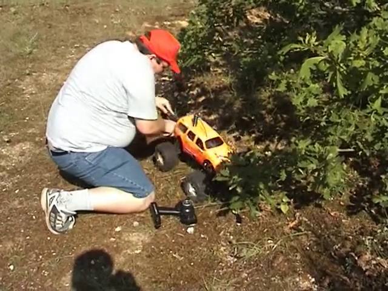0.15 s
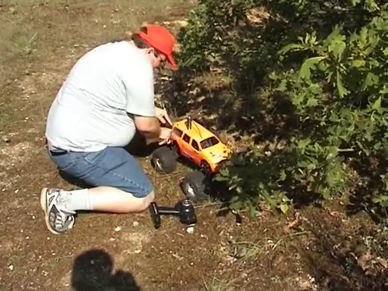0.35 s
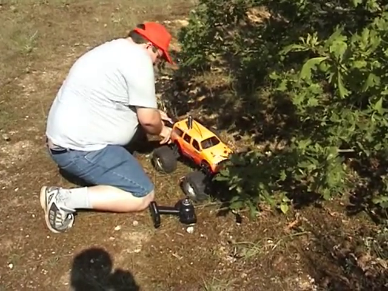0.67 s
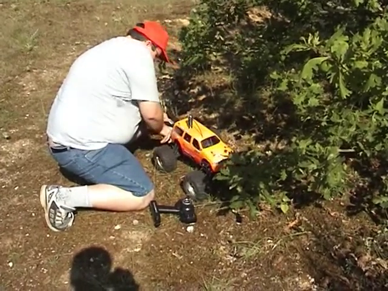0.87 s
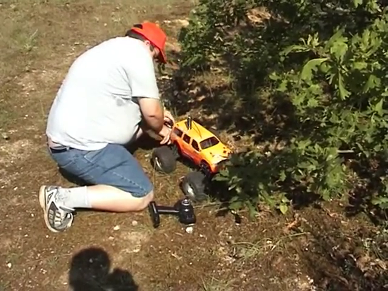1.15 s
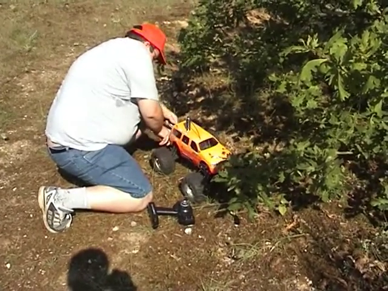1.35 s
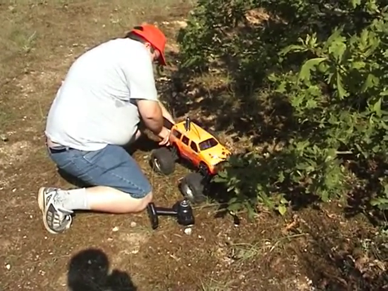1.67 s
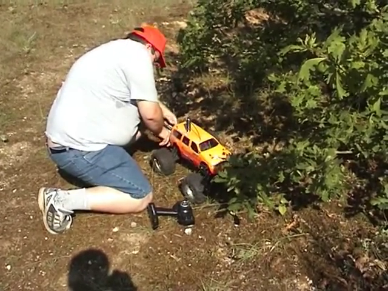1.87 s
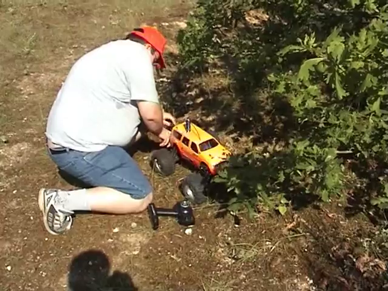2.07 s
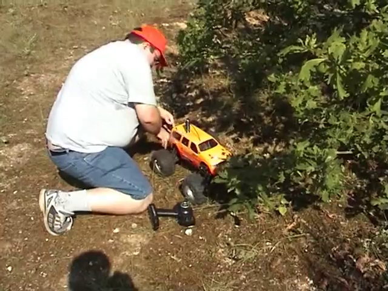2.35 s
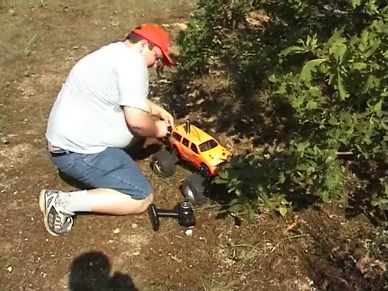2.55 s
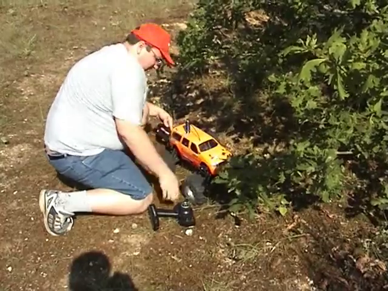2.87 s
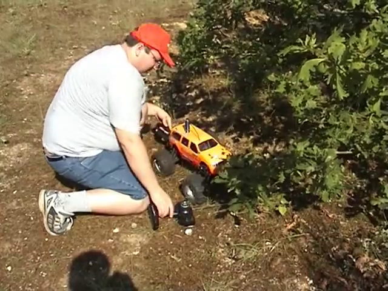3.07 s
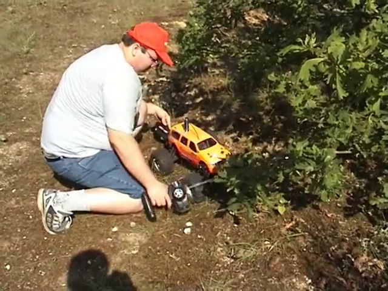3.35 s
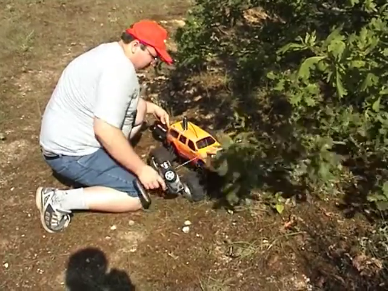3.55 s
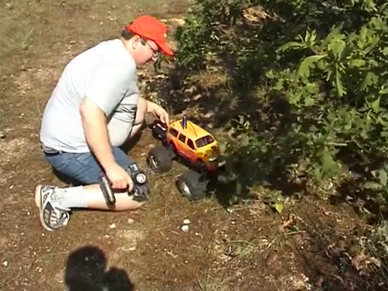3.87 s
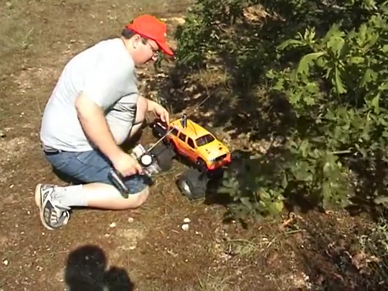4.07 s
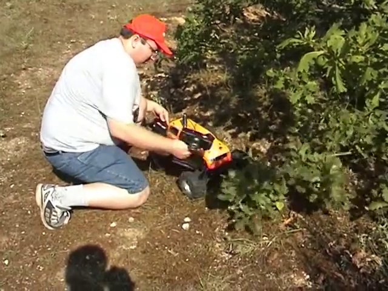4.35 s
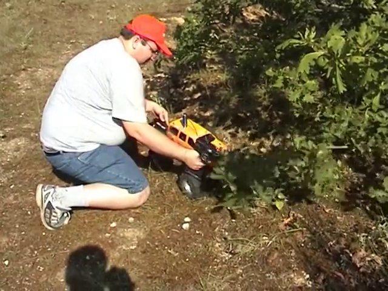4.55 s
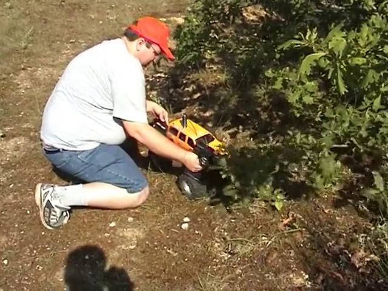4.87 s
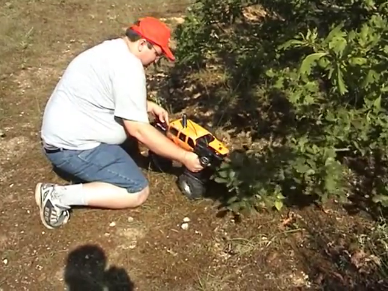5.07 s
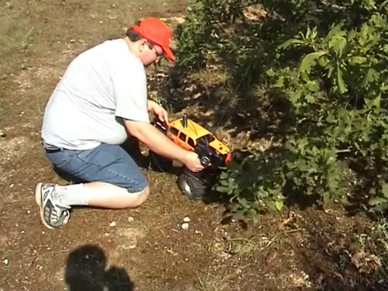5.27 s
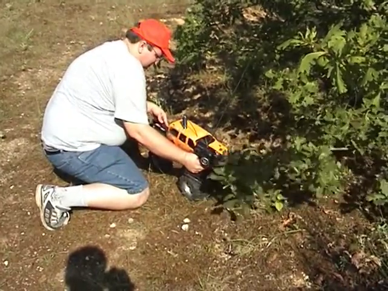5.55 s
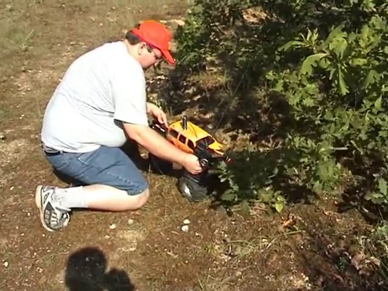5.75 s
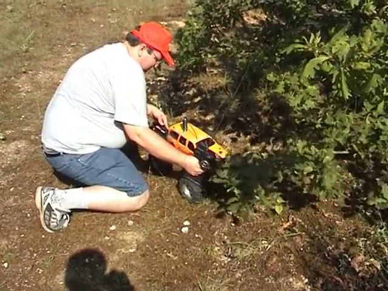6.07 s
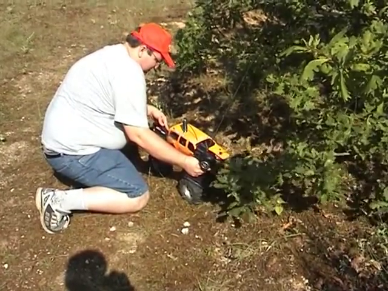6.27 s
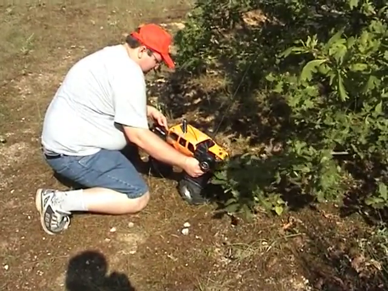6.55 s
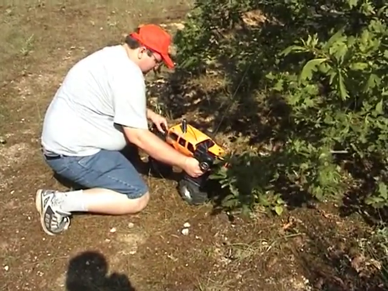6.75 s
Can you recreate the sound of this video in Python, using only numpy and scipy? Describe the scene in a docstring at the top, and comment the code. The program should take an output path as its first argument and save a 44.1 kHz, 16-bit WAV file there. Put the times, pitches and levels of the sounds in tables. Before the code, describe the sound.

Outdoors, nearly still air with faint knocks, soft tyre bumps and scuffs as a plastic model truck is handled. A sharper clatter and leaf rustle follow as the starter tool is picked up and brought to it. Two short geared whines with puffs and clacks turn the engine over, the second coughing. On the third it catches and runs very loud, buzzing and uneven until the cut. Microphone a few steps away, slight echo from foliage.

```python
"""A small two-stroke glow engine idles loudly and unevenly: each burn is a pressure pulse that excites the
resonances of a tuned pipe and of a finned cylinder, with a spurt of gas noise.
Before it catches on the third pull, a hand starter's gear whine turns it over in two bursts, with air puffs,
drive clacks and a few coughs. Earlier the model truck is handled: decaying knocks, tyre booms, scuffs and
rustling leaves, built from impulses and swelling noise. Foliage echoes and open air surround it."""
import sys
import numpy as np
from scipy import signal
from scipy.fft import rfft, irfft, next_fast_len
from scipy.io import wavfile

SR = 44100
rng = np.random.default_rng(int(sys.argv[2]) if len(sys.argv) > 2 else 0)


def to_wav(sig):
    """Store sig (one row per channel, or 1-D mono) as 16-bit WAV at the path in sys.argv[1].

    Samples outside -1..1 are clipped; the rate is SR.
    """
    pcm = np.clip(np.atleast_2d(sig), -1, 1) * 32767
    pcm = np.round(pcm).astype(np.int16)
    wavfile.write(sys.argv[1], SR, pcm.T)  # frames by channels


N = 304290
TIME = np.arange(N) / SR
CATCH_S = 6.0412

# Idle speed. Each row: time in seconds, firing rate in Hz.
IDLE_SPEED = [(6.04, 104), (6.126, 111.7), (6.266, 120), (6.338, 117), (6.388, 110.5), (6.436, 118),
              (6.516, 123.3), (6.598, 121.7), (6.642, 118), (6.696, 123.2), (6.72, 116), (6.768, 126.5),
              (6.854, 122.7), (6.9, 114.3)]
# Single firings before the engine catches. Each row: time in seconds, relative level in dB.
COUGHS = [(5.6286, 1.5), (5.6392, 0), (5.6484, -2), (5.6578, -0.5), (5.6887, -5.5), (5.701, -2.5)]
# Uneven idle: chance of a weak burn (never two running), its level, and the spread of all levels.
WEAK_CHANCE, WEAK_DB, SPREAD_DB = .27, -4.5, 1
# Delay after a weak burn and random timing spread, as shares of a turn.
STUMBLE_TURNS, JITTER_TURNS = .08, .026
# Exhaust modes under a firing. Each row: frequency in Hz, bandwidth in Hz, gain in dB, polarity.
HOT_PIPE_MODES = [(168.5, 134, 27, 1), (209, 23.5, 31, 1), (259.6, 96, 36.5, -1), (714, 204, 21.5, 1),
                  (742, 70, 24, -1), (1188.5, 159, 27, 1), (1320, 406, 29, -1), (1584, 400, 26.5, 1),
                  (2047, 33.3, 30.5, 1), (2615, 89, 11, -1), (2850, 49, 13, -1)]
# The low boom follows only this share of a burn's strength in dB.
BOOM_FOLLOWS = 0.68
# Modes of the cylinder and cooling fins. Each row: frequency in Hz, bandwidth in Hz, relative gain in dB.
FIN_MODES = [(3630, 58, -1.5), (4040, 120, -5.5), (5110, 49, 7.5), (5150, 73, -24), (5850, 136, -1.5),
             (6300, 45, -5), (7300, 51, -11), (7550, 57, 0), (9200, 180, -20), (11500, 51, -5)]
# The fins start at this relative level and ring up after the catch.
FINS_START_DB, SETTLE_S = -4, 0.24
# Spectrum of the escaping gas. Each row: frequency in Hz, relative level in dB.
EXHAUST_HISS = [(2000, -10), (2600, 16.5), (3300, -3.5), (7500, -4.5), (10500, -6), (12500, -28),
                (14000, -39)]

# Unfired strokes puffing through the pipe. Each row: time in seconds, relative level in dB.
PUFFS = [(5.084, -27.5), (5.109, -1), (5.1601, -0.5), (5.2076, -1), (5.2539, 0), (5.531, -0.5),
         (5.587, -0.5), (5.6871, -0.5), (5.727, -18.5), (5.742, -16.5)]
# Exhaust modes under cold air. Each row: frequency in Hz, bandwidth in Hz, relative gain in dB, polarity.
COLD_PIPE_MODES = [(179, 96, 30, 1), (226.6, 10.4, 44, -1), (314, 83, 36, -1), (378.4, 27.5, 34, -1),
                   (729, 26, 33.5, 1), (1560, 500, 29, -1)]

# Pulls on the starter's trigger. Each row: on in seconds, off in seconds, coasting time in seconds, level in dB.
TRIGGER = [(5.022, 5.228, .125, -24.5), (5.491, 5.632, .13, -26), (5.992, 6.223, 0.16, -25)]
# Gear mesh at free speed, spin-up time constant, and exponent of loudness against speed.
FREE_MESH_HZ, SPIN_UP_S, LOUDNESS_POWER = 2520, .035, 1.32
# Compression slows it just before each puff: share of speed lost, lead, Gaussian width.
SAG_SHARE, SAG_LEAD_S, SAG_WIDTH_S = .08, 0.00504, .011
# Once the engine runs the gears are unloaded: change of their whine, and the time it takes.
UNLOADED_DB, UNLOAD_S = -9.5, 0.066
# Starter partials. Each row: multiple of the gear mesh frequency, relative level in dB.
WHINE_PARTIALS = [(1, 0), (4 / 3, -17.5), (5 / 3, -14), (2, -10), (8 / 3, -13.5), (3, -7.5), (4, -4),
                  (3.9, -21)]
# Gear noise spectrum. Each row: frequency in Hz, relative level in dB.
GEAR_NOISE = [(300, 0), (550, -1.5), (780, -1.5), (1050, -11.5), (1600, 0.5), (2500, -2.5), (3300, -5),
              (5400, -13.5), (6800, -7), (8300, -9.5), (9800, -5.5), (11700, -9), (14000, -32)]
# Spectrum of the churned air. Each row: frequency in Hz, relative level in dB.
CHURN_COLOUR = [(110, -11), (230, 12), (380, -9), (550, -18), (900, -4)]
# The drive clacks as it pushes the piston over compression. Each row: time in seconds, relative level in dB.
CLACKS = [(5.031, -30.5), (5.133, -19.5), (5.182, -19.5), (5.228, -16.5), (5.24, -27.5), (5.282, -22.5),
          (5.307, -27.5), (5.503, -34), (5.559, -19), (5.6074, -14.5), (5.6693, -10.5), (5.675, -20),
          (5.7099, -14), (5.7432, -27.5), (6.004, -33)]
# Clack spectrum. Each row: frequency in Hz, relative level in dB.
CLACK_COLOUR = [(530, -3), (900, -6.5), (1490, -6), (2010, -13), (2560, 0.5), (3040, -9.5), (3650, -8),
                (5780, -24.5), (7280, -15.5), (10500, -15), (14000, -32.5)]
CLACK_T60_S, CLACK_ATTACK_S = .031, 0.0013
# Metal that rings on after a clack. Each row: frequency in Hz, bandwidth in Hz, gain in dB.
CLACK_RINGS = [(2950, 22, 22), (7680, 4, 16)]

# Knocks on the plastic truck and its gear.
# Each row: time in seconds, relative level in dB, ring frequency in Hz, hardness of the contact in dB.
KNOCKS = [(0.234, -54, 1300, -11), (0.295, -63, 1280, 12), (0.334, -43.5, 910, -13), (1.33, -45, 875, -17),
          (1.585, -50, 960, -19), (1.789, -51.5, 1310, -5), (1.906, -51, 1170, -4),
          (1.924, -35.5, 1390, -1), (3.038, -36.5, 1240, 5), (3.373, -50, 1930, 5),
          (3.443, -23.5, 1576, 2.5), (3.494, -35, 1610, 2.5), (3.584, -44.5, 1660, -3),
          (3.645, -45, 921, -2), (4.134, -62.5, 912, 21.5), (4.576, -34, 1520, -1.5),
          (4.597, -42, 1040, -3), (4.612, -43.5, 1480, -11), (4.632, -44.5, 1540, -7)]
# Spectra of a knock's thump, shell and tick. Each row: frequency in Hz, relative level in dB.
THUMP_COLOUR = [(170, -23), (300, 11), (450, -8), (750, 2), (1200, -22)]
SHELL_COLOUR = [(450, -18), (900, -5), (1400, 1), (2400, -1.5), (4000, -11), (7000, -34)]
TICK_COLOUR = [(2000, -10), (4000, -1), (10000, -3.5), (13000, -19)]
# The truck drops on its tyres. Each row: time in seconds, relative level in dB.
BOUNCES = [(0.235, -48.5), (0.335, -47), (1.923, -38.5), (4.612, -44.5)]
TYRE_HZ, TYRE_WIDTH_HZ = 200, 17

# The bush is brushed and springs back.
# Each row: peak in seconds, relative level in dB, rise constant in seconds, fall constant in seconds.
BRUSHES = [(3.455, -44, 0.01, 0.08), (3.75, -51, .1, 0.095), (4.4, -56, 0.25, 0.075),
           (4.61, -54, 0.042, .12)]
# Hands and gear scuff over the shell.
# Each row: peak in seconds, relative level in dB, rise constant in seconds, fall constant in seconds.
SCUFFS = [(0.17, -60.5, .06, .04), (0.32, -59, 0.033, 0.037), (1.265, -66, .02, .02),
          (2.48, -52.5, 0.023, .022), (3.33, -60, .08, 0.099), (3.735, -54.5, 0.018, 0.031)]
# Spectrum of the rubbing noise. Each row: frequency in Hz, relative level in dB.
LEAF_COLOUR = [(400, 2.5), (1000, -7), (1700, -1), (3000, -0.5), (5000, -4.5), (9000, -4), (11000, -10.5),
               (13500, -24)]
# Modes of the plastic body shell. Each row: frequency in Hz, bandwidth in Hz, relative gain in dB.
SHELL_MODES = [(833, 110, 1), (1250, 130, 1.5), (1550, 160, 3), (1940, 160, -4.5), (2740, 210, -6),
               (4100, 280, -9)]

# Left minus right for sound from the truck. Each row: frequency in Hz, level difference in dB.
TRUCK_PAN = [(200, 0.83), (650, -0.8), (1250, 5.5), (2200, 2), (4000, -1), (7400, -3.5), (13000, 2)]
# Spectrum of the background air. Each row: frequency in Hz, relative level in dB.
AIR_COLOUR = [(15, -44), (25, -15.5), (60, -6), (182, -10), (286, -6.5), (335, -9), (584, -9.5),
              (741, -13.5), (824, -12.5), (1440, -20.5), (2860, -20.5), (3350, -24), (9920, -28.5),
              (12300, -40), (14000, -70)]
# Stereo width of the air. Each row: frequency in Hz, side minus mid in dB.
AIR_WIDTH = [(60, -7), (110, -0.5), (200, 0), (370, -1.5), (670, 3.5), (1220, 4.5), (2230, 2), (4070, 1.5),
             (7440, -3), (13600, -4)]
CUTOFF_HZ = 14100


def engine(pipe_db, fins_db, blow_noise, hiss_db, rumble_db, turbulence_db):
    """Pulse excitation: each firing rings the pipe, strikes the finned cylinder and lets out a spurt of gas."""
    pulses = firings(count=200) + clicks(*np.transpose(COUGHS))
    spurt = fade(pulses, t60=.075, attack_s=.0006)
    # turbulence behind each pulse roughens the upper modes of the pipe
    turbulence = from_db(turbulence_db) * spurt * rng.standard_normal(N)
    boom = pipe(pulses ** BOOM_FOLLOWS, HOT_PIPE_MODES[:3])
    exhaust = boom + pipe(pulses + turbulence, HOT_PIPE_MODES[3:])

    blow_tail = fade(pulses, t60=0.016, attack_s=0.00028)
    blows = pulses + blow_noise * blow_tail * rng.standard_normal((2, N))
    fins = sum(from_db(db) * resonate(blows, hz, width) for hz, width, db in FIN_MODES)
    fins *= from_db(FINS_START_DB * np.clip(1 - (TIME - CATCH_S) / SETTLE_S, 0, 1))

    hiss = noise(EXHAUST_HISS, side_db=-10)
    rumble = noise([(20, -7), (70, -5.0), (300, 0), (900, -5), (1500, -25)], side_db=-9.5)
    gas = from_db(hiss_db) * hiss + from_db(rumble_db) * rumble
    return from_db(pipe_db) * exhaust + from_db(fins_db) * fins + spurt * gas


def firings(count):
    """Combustion irregularity: now and then a turn burns weakly, and the next firing comes late."""
    times, levels, s, was_weak = [], [], CATCH_S, False
    for chance, size, timing in zip(rng.random(count), *rng.standard_normal((2, count))):
        turn_s = 1 / np.interp(s, *np.transpose(IDLE_SPEED))
        weak = chance < WEAK_CHANCE and not was_weak and len(times) > 1
        # the weak burn itself comes early by half the stumble
        shift_turns = STUMBLE_TURNS * (was_weak - weak / 2) + JITTER_TURNS * timing
        times.append(s + shift_turns * turn_s)
        levels.append(weak * WEAK_DB + SPREAD_DB * size)
        # the flywheel holds the mean speed through weak burns
        s += turn_s
        was_weak = weak
    sounding = np.array(times) < N / SR
    return clicks(np.array(times)[sounding], np.array(levels)[sounding])


def pipe(x, modes):
    """Modal superposition: pressure pulses ring the modes of the exhaust, each with its polarity."""
    return sum(np.sign(polarity) * from_db(db) * resonate(x, hz, width)
               for hz, width, db, polarity in modes)


def puffs(puff_db, soft_hz, gulp_db, gulp_s):
    """Soft excitation: the port opens on a push of air, a weaker gulp follows and the pipe rings on."""
    s, db = np.transpose(PUFFS)
    strokes = clicks(s, db) - clicks(s + gulp_s, db + gulp_db)
    soften = signal.butter(2, soft_hz, fs=SR, output="sos")
    return from_db(puff_db) * pipe(signal.sosfilt(soften, strokes), COLD_PIPE_MODES)


def starter(whine_db, gears_db, clack_db, churn_db, wobble, flutter_db):
    """Gear-mesh radiation: pitch and level follow motor speed; the drive clacks and the piston churns air."""
    pulls = [(motor_speed(on_s, off_s, coast_s), db) for on_s, off_s, coast_s, db in TRIGGER]
    speed = sum(share for share, db in pulls)
    level = sum(from_db(db) * share ** LOUDNESS_POWER for share, db in pulls)

    mesh_hz = FREE_MESH_HZ * speed * (1 + wobble * (drift(700) + drift(110)))
    phase = 2 * np.pi * np.cumsum(mesh_hz) / SR
    partials = sum(from_db(db + flutter_db * drift(160)) * np.sin(multiple * phase)
                   for multiple, db in WHINE_PARTIALS)
    whine = speed ** 3 * rms_one(partials)
    whine *= from_db(UNLOADED_DB * np.clip((TIME - CATCH_S) / UNLOAD_S, 0, 1))
    # the teeth scrape harder once per motor turn
    gears = noise(GEAR_NOISE, side_db=-7) * (1 + .6 * np.sin(phase / 9))
    churn = speed ** 3 * noise(CHURN_COLOUR, side_db=-25)
    running = from_db(whine_db) * whine + from_db(gears_db) * gears + from_db(churn_db) * churn

    hits = clicks(*np.transpose(CLACKS))
    clacks = fade(hits, CLACK_T60_S, CLACK_ATTACK_S) * noise(CLACK_COLOUR, side_db=-16.5)
    rings = sum(from_db(db) * resonate(hits, hz, width) for hz, width, db in CLACK_RINGS)
    return level * running + from_db(clack_db) * clacks + rings


def motor_speed(on_s, off_s, coast_s):
    """Rotor inertia and load: share of free speed through spin-up, compression sags and coasting to rest."""
    spin_up = 1 - np.exp(-np.maximum(TIME - on_s, 0) / SPIN_UP_S)
    coast = np.clip(1 - (TIME - off_s) / coast_s, 0, 1)
    load = sum(from_db(db) * np.exp(-np.minimum(((TIME - s + SAG_LEAD_S) / SAG_WIDTH_S) ** 2, 20))
               for s, db in PUFFS if on_s < s < off_s + coast_s)
    return spin_up * coast * np.clip(1 - SAG_SHARE * load, 0, 1)


def knocks(thump_db, body_db, tick_db, ring_db, ring_width_hz, softening):
    """Impact of solids: thump, shell ring and tick; a harder contact ticks more and thumps less."""
    s, db, ring_hz, hardness = np.transpose(KNOCKS)
    thumps = clicks(s, db + thump_db - softening * hardness)
    bodies = clicks(s, db + body_db)
    ticks = clicks(s, db + tick_db + hardness)
    out = fade(thumps, t60=.04, attack_s=.001) * noise(THUMP_COLOUR, side_db=-14)
    out += fade(bodies, t60=.03, attack_s=.0007) * noise(SHELL_COLOUR, side_db=-12)
    out += fade(ticks, t60=0.019, attack_s=.0004) * noise(TICK_COLOUR, side_db=-14)
    # the tonal ring starts about 2 ms after the contact
    return out + sum(resonate(clicks([at + 0.001896], [level + ring_db]), hz, ring_width_hz)
                     for at, level, hz in zip(s, db, ring_hz))


def tyres(tyre_db):
    """Resonance on impact: the soft tyres give a short low boom."""
    return from_db(tyre_db) * resonate(clicks(*np.transpose(BOUNCES)), TYRE_HZ, TYRE_WIDTH_HZ)


def rustle(movements, hiss_db, crackle_db, tick_db, ticks_per_s):
    """Friction noise: rubbing gives a fine crackle, with small random ticks against the plastic shell."""
    level = swells(movements)
    crackle = from_db(hiss_db + crackle_db * drift(500)) * noise(LEAF_COLOUR, side_db=-10.5)
    touches = level * (rng.random(N) < ticks_per_s / SR)
    strikes = touches * rng.standard_normal(N) + 1e-18
    ticks = sum(from_db(db) * resonate(strikes, hz, width) for hz, width, db in SHELL_MODES)
    return level * crackle + from_db(tick_db) * ticks


def swells(rows):
    """Exponential growth and decay: each movement grows to its peak and dies away."""
    return sum(from_db(db) * np.exp(-np.maximum((s - TIME) / rise_s, (TIME - s) / fall_s))
               for s, db, rise_s, fall_s in rows)


def bush(x, scatter_db, count):
    """Scattering: faint echoes from the foliage and the ground, with slightly different delays in each ear."""
    echoes = np.zeros((2, N))
    delays = rng.uniform(.003, .04, count)
    skews = rng.normal(0, .00004, count)
    for delay, skew, strength in zip(delays, skews, rng.standard_normal(count)):
        for ear, s in enumerate((delay + skew, delay - skew)):
            lag = int(s * SR)
            # later echoes are weaker in inverse proportion to delay
            echoes[ear, lag:] += strength * .003 / delay * x[ear, :N - lag]
    high_pass = signal.butter(2, 800, "high", fs=SR, output="sos")
    return from_db(scatter_db) * signal.sosfilt(high_pass, echoes)


def outdoors(air_db, hum_hz, hum_db):
    """Diffuse background: still air, widest around 1.2 kHz, and a faint wavering hum."""
    tone = np.sin(2 * np.pi * np.cumsum(hum_hz + 2 * drift(8)) / SR)
    hum = rms_one(tone * from_db(2 * drift(8.6)))
    mid, side = rms_one(colour(rng.standard_normal((2, N)), AIR_COLOUR))
    air = mid + colour(side, AIR_WIDTH) * [[1], [-1]]
    return from_db(air_db) * air + from_db(hum_db) * hum


def from_db(db):
    """Logarithmic level: decibels to amplitude gain."""
    return 10 ** (np.asarray(db) / 20)


def rms_one(x):
    """Normalisation: scale to unit mean power."""
    return x / np.sqrt(np.mean(x ** 2) + 1e-20)


def colour(x, points):
    """Spectral shaping: filter by a (Hz, dB) curve over log frequency, with a sharp drop beyond its ends."""
    size = next_fast_len(N + 4096)
    hz, db = np.transpose(points)
    bins = np.maximum(np.fft.rfftfreq(size, 1 / SR), 1)
    curve = np.interp(np.log(bins), np.log(hz), db, left=db[0] - 30.5, right=db[-1] - 27)
    return irfft(rfft(x, size) * from_db(curve), size)[..., :N]


def noise(points, side_db):
    """Partial coherence: coloured stereo noise of unit power, mostly alike in both ears."""
    mid, side = rng.standard_normal((2, N))
    return rms_one(colour(mid + from_db(side_db) * side * [[1], [-1]], points))


def drift(rate):
    """Random modulation: straight lines between normal draws of unit spread, at a rate in Hz."""
    knots = rng.standard_normal(int(N / SR * rate) + 2)
    return np.interp(TIME * rate, np.arange(len(knots)), knots)


def clicks(times, db):
    """Impulse excitation: one single-sample impulse for each event."""
    out = np.zeros(N)
    samples = np.clip(np.round(np.asarray(times) * SR).astype(int), 0, N - 1)
    np.add.at(out, samples, from_db(db))
    return out + 1e-18


def fade(x, t60, attack_s):
    """Exponential damping: each impulse becomes an envelope that rises quickly and dies away."""
    fall, rise = from_db(-60 / (t60 * SR)), np.exp(-1 / (attack_s * SR))
    decay = signal.lfilter([1], [1, -fall], x)
    return signal.lfilter([1 - rise], [1, -rise], decay)


def resonate(x, hz, width):
    """Damped oscillator: a two-pole resonance with gain about 1 at its top."""
    r = np.exp(-np.pi * width / SR)
    zeros = np.array([1, 0, -1]) * (1 - r * r) / 2
    return signal.lfilter(zeros, [1, -2 * r * np.cos(2 * np.pi * hz / SR), r * r], x)


def scene():
    """Superposition: the truck's sources, panned by frequency mostly to the left, in open air."""
    truck = engine(pipe_db=1, fins_db=8, blow_noise=0.062, hiss_db=-32.5, rumble_db=-31.5, turbulence_db=-38)
    truck += puffs(puff_db=1.5, soft_hz=546, gulp_db=-12.5, gulp_s=.0205)
    truck += starter(whine_db=-3, gears_db=-2, clack_db=3.5, churn_db=-1.0, wobble=.018, flutter_db=5)
    truck += knocks(thump_db=-5, body_db=2, tick_db=-3.5, ring_db=44.5, ring_width_hz=99, softening=0.92)
    truck += tyres(tyre_db=54.0)
    truck += bush(truck, scatter_db=-9.0, count=14)

    pan = [(1 / 2, 0)] + TRUCK_PAN + [(SR / 2, 0)]
    # each ear takes half of the level difference
    ears = [colour(ear, [(hz, side * db / 2) for hz, db in pan]) for ear, side in zip(truck, (1, -1))]
    leaves = rustle(BRUSHES, hiss_db=-0.5, crackle_db=4, tick_db=33, ticks_per_s=120)
    scuffs = rustle(SCUFFS, hiss_db=-4, crackle_db=4.5, tick_db=38.5, ticks_per_s=200)
    return np.array(ears) + leaves + scuffs + outdoors(air_db=-54.5, hum_hz=578, hum_db=-64.5)


def record(dry):
    """Limiting and band limitation: peaks clip at full scale, then a steep low-pass cuts the top."""
    low_pass = signal.ellip(10, .1, 80, CUTOFF_HZ, fs=SR, output="sos")
    return signal.sosfilt(low_pass, np.clip(dry, -1, 1))


dry = scene()
out = record(dry)
to_wav(out)
```